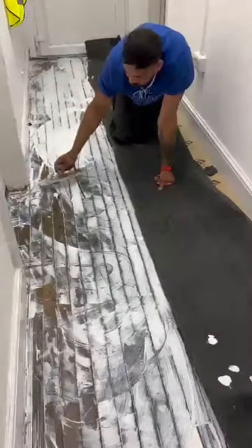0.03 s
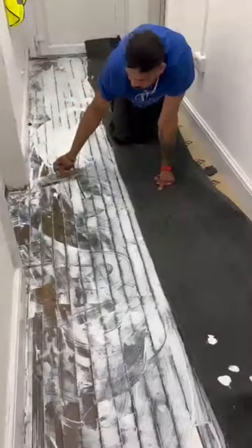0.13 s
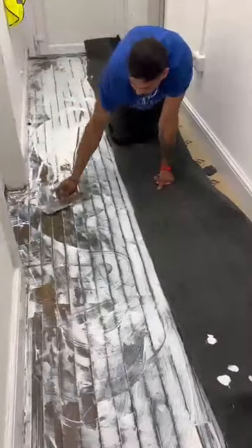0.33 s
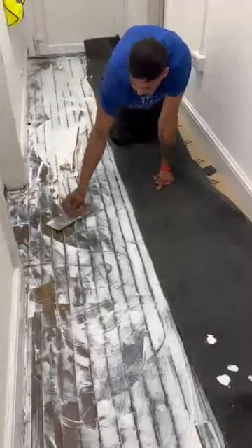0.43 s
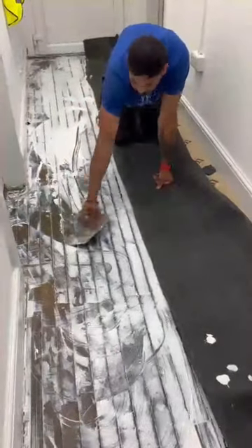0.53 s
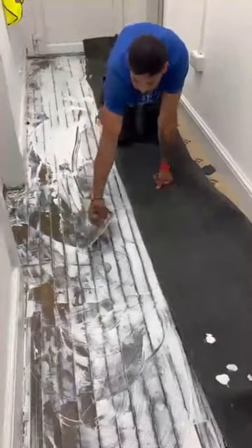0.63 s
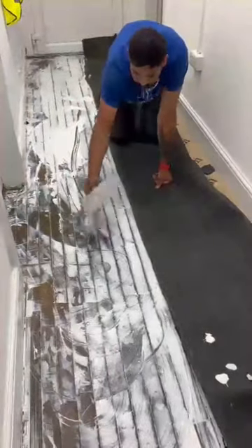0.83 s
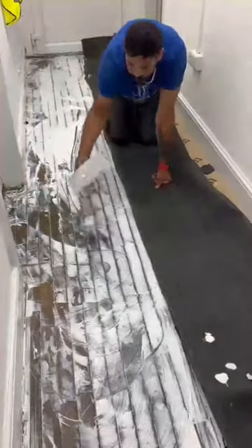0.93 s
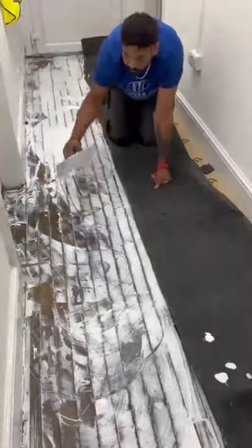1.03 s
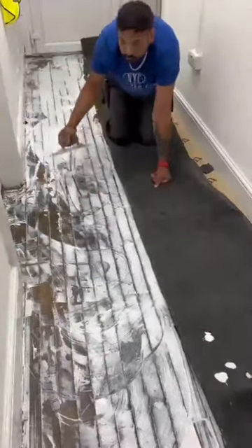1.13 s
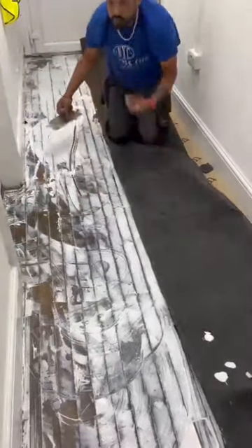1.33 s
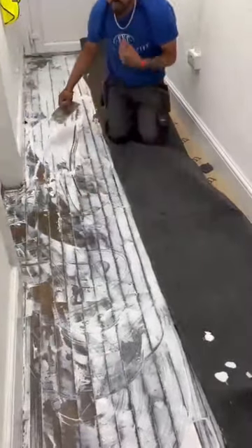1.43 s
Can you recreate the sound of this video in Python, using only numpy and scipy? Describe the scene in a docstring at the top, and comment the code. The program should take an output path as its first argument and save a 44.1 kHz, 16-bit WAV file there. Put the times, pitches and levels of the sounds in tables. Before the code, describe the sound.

One ringing scrape of a trowel over wet adhesive, then light knocks in a corridor.

```python
"""A trowel swept through wet glue

In a bare corridor, a notched steel trowel touches down and makes one sweep through floor glue.
Its teeth stick and slip in a ringing scrape, while the floor groans and the paste crackles. The pitch
climbs as the blade tilts up before lifting off. The kneeling worker then shifts back with soft knocks,
light scuffs of the blade and rustling clothes, over the low hum of the building."""
import sys
import numpy as np
from scipy import signal
from scipy.fft import rfft, irfft, next_fast_len
from scipy.io import wavfile
from scipy.ndimage import map_coordinates

SR = 44100
rng = np.random.default_rng(int(sys.argv[2]) if len(sys.argv) > 2 else 0)


def put_to_file(sound):
    """Save the sound as 16-bit audio at rate SR, in the file named by the first command-line argument."""
    columns = np.atleast_2d(sound).T  # one column per channel
    safe = np.clip(columns, -1, 1)
    whole_steps = np.round(safe * 32767)
    wavfile.write(sys.argv[1], SR, whole_steps.astype(np.int16))


N = 66150

# The sweep. Each row: time in seconds, then push on the blade, push on the floor and tearing
# of the paste in dB. All dB levels in these tables are relative.
SWEEP = [(.24, -80, -80, -94), (.295, -46.5, -47, -80), (.322, -37.5, -44, -51.5),
         (.352, -39, -39.5, -47.5), (.378, -36, -42, -42), (.428, -35, -41, -64.5), (.472, -31, -29, -39),
         (.525, -28.5, -31, -41), (.567, -35, -27.5, -39), (.608, -29.5, -36, -38), (.648, -31, -29, -36),
         (.68, -37, -40, -53), (.732, -51, -36.5, -56), (.765, -51, -50.5, -67), (.88, -72, -91, -89)]
# The blade stiffens as it tilts. Each row: time in seconds, main ring in Hz, low drone in Hz.
TILT_PITCHES = [(.32, 609.7, 298.6), (.40, 750.4, 314.8), (.45, 559.8, 330.1), (.54, 718.8, 331.7),
                (.595, 641.2, 327.6), (.635, 937.6, 357.3), (.72, 1000, 338.6)]
# Steady pitches that ring in the scrape. Each row: pitch in Hz, width in Hz, level in dB.
SCRAPE_RINGS = [(492, 96, -4), (593, 42, 1), (645, 60, -3), (816, 116, -5), (980, 45, -3), (1134, 34, -0.5),
                (1354, 73, -2), (1490, 108, -2), (1755, 200, -8), (2150, 77, -7.5)]
HIGH_RINGS = [(2750, 53, 1), (3160, 35, 1), (3567, 69, 3.5), (4340, 154, -2)]
# How the floor rings. Each row: pitch in Hz, level in dB, seconds to fade by 60 dB.
FLOOR_RINGS = [(132, -7.5, 0.31), (162.3, -5, 0.32), (190.2, 8, 0.15), (270.7, -2.5, 0.29),
               (343.9, -1.5, 0.31)]
# The edge catches. Each row: middle and half length in seconds, level in dB, pitch in Hz.
EDGE_SCUFFS = [(0.534, 0.016, -37.5, 1370), (.638, .017, -31, 948), (0.66, .026, -37, 2095),
               (1.125, 0.016, -61.5, 3200), (1.211, 0.011, -59.5, 3400), (1.32, 0.016, -60.5, 1900),
               (1.486, 0.021, -54.5, 2440)]
# The edge touches down. Each row: start in seconds, level in dB.
EDGE_TICKS = [(0.2006, -42), (0.202, -37.5), (0.21, -52.5)]
# Trowel, hand and knees hit the floor. Each row: start in seconds, thud in dB, clack in dB.
BLOWS = [(.206, -38.5, -51), (0.235, -33, -36.5), (0.2544, -27, -42.5), (0.345, -49.5, -26),
         (0.974, -40.5, -40.5), (1.036, -37.5, -60), (1.168, -46, -71), (1.318, -55, -42),
         (1.461, -45, -38.5)]
# The worker moves. Each row: time in seconds, swish of cloth in dB, rubbing on the floor in dB.
MOVES = [(0, -55, -47), (.05, -65.5, -55), (.075, -56.5, -92), (.16, -70, -76), (.28, -57.5, -53.5),
         (.4, -49, -51.5), (.88, -67, -58), (.94, -68, -56.5), (1.0, -63.5, -52), (1.06, -63.5, -57.5),
         (1.125, -62.5, -55.5), (1.18, -63, -66), (1.215, -59.5, -49.5), (1.27, -63, -60.5),
         (1.32, -63.5, -55), (1.39, -70.5, -69), (1.44, -72, -70), (1.49, -67, -70)]
# The building hums. Each row: pitch in Hz, level in dB.
HUM_TONES = [(57, -83), (113, -59), (167, -55.5), (220, -52), (344, -54)]
# Filters that colour each noise. Each row: frequency in Hz, level in dB.
# The narrow gap near 6-7 kHz is a filter over the sound, not part of paste, cloth or air.
CRACKLE_FILTER = [(300, 6.5), (900, -4.5), (1800, 3), (2700, 2.5), (3800, -9), (5200, 4), (6300, -38.5),
                  (7300, -11), (9200, -16), (11000, -36)]
TICK_FILTER = [(300, -9.5), (1000, 16), (2300, 10.5), (2900, 10.5), (4500, 9), (6500, -2), (9000, 6.5),
               (11000, 1)]
CLACK_FILTER = [(150, -16.5), (380, 8), (500, -7.5), (680, 7.5), (1100, -9.5), (2000, -24.5), (5000, -48),
                (11000, -49.5)]
SWISH_FILTER = [(300, -16), (1200, 3), (2200, 3), (3800, 7), (5200, 5.5), (6300, -28.5), (7300, 1.5),
                (9200, -1.5), (11000, -57)]
RUB_FILTER = [(120, -4.5), (350, 1.5), (480, -0.5), (660, 0.5), (1100, -10.5), (2000, -11.5), (4000, -12.5),
              (9000, -86)]
RUMBLE_FILTER = [(20, -30.5), (35, -1.5), (58, 5), (90, 2), (180, -2.5), (260, -4.5), (350, -7), (460, -19),
                 (650, -11), (1000, -20.5), (1700, -29), (4000, -29), (7000, -78), (11000, -40)]
# The corridor's echo. Each row: frequency in Hz, seconds to fade by 60 dB.
ECHO_FADES = [(150, 0.047), (400, 0.39), (1000, 0.41), (3000, 0.35), (6000, 0.037), (11000, 0.14)]
# Sound from all sides at two microphones. Each row: frequency in Hz, likeness (1 or more: the same).
BASS_LIKENESS = [(130, .9995)]
UPPER_LIKENESS = [(270, 1.1), (570, 0.56), (1200, -0.2), (2500, -0.26), (4500, -0.039), (9000, -0.87)]
# How the microphones differ. Each row: frequency in Hz, left minus right in dB.
BASS_BALANCE = [(185, 0)]
UPPER_BALANCE = [(340, 3), (620, 4.5), (1110, 4.5), (2000, 3.5), (3550, -1.5), (6350, -0.7), (11400, 0.5)]

RINGS_DB, EDGE_DB, HIGH_RINGS_DB, PASTE_DB = -3.5, -3.5, -6, -3
DRONE_DB, DRONE_TONE_DB, FLOOR_DB = -2.5, -4.5, -9.5
DIRECT_DB, ECHO_DB, AIR_DB = -3.5, -2.5, -47.5
TICK_FADE_S, CLACK_FADE_S, CLACK_RISE_S, THUD_RISE_S = 0.019, 0.062, 0.005, 0.0024
LEFT_LAG_S, TOP_HZ = 0.000118, 11900


def scrape():
    """Teeth slip in a ringing scrape as paste tears in tiny pops. Gives scrape and floor groan."""
    push_db, floor_push_db, tear_db = curves(SWEEP)
    edge_hz, drone_hz = curves(TILT_PITCHES)
    chatter = gain(2 * wobble(109.97))  # the level flickers quickly
    push, floor_push = chatter * gain(push_db), chatter * gain(floor_push_db)
    rings = gain(RINGS_DB) * resonate(push * slips(), SCRAPE_RINGS)
    edge = gain(EDGE_DB) * push * gliding_ring(slips(), edge_hz, width=0.38)
    drone = gain(DRONE_DB) * floor_push * gliding_ring(slips(), drone_hz, width=0.33)
    pops = clicks(per_second=2600, spread_db=4)
    paste = chatter * gain(PASTE_DB + tear_db) * coloured(pops, CRACKLE_FILTER)
    high_rings = chatter * gain(HIGH_RINGS_DB + tear_db) * resonate(slips(), HIGH_RINGS)
    floor_tap = np.diff(floor_ring(0))  # the floor's answer to one slip
    floor_tap /= np.linalg.norm(floor_tap)
    floor = gain(FLOOR_DB) * signal.fftconvolve(floor_push * slips(), floor_tap)[:N]
    tone = gain(DRONE_TONE_DB + floor_push_db) * drone_tone(drone_hz)
    return rings + edge + drone + paste + high_rings, floor + tone


def slips():
    """Steel sticks and lets go, making a tiny click each time."""
    return clicks(per_second=2200, spread_db=3)


def drone_tone(hz):
    """The firm core of the drone: a slightly unsteady tone that follows hz."""
    phase = 2 * np.pi * np.cumsum(hz) / SR + .5 * wobble(40)
    return normalise(gain(2 * wobble(39.3)) * np.sin(phase))


def scuffs():
    """Each catch of the edge swells and fades; its gritty ring rises as the blade tips."""
    out = np.zeros(N)
    for middle, half_s, db, hz in EDGE_SCUFFS:
        t = np.arange(N) / SR - middle
        octaves = 4.5 * np.clip(t, -2 * half_s, 2 * half_s)
        swell = gain(db) * np.exp(-.5 * (t / half_s) ** 2)
        out += swell * gliding_ring(slips(), hz * 2 ** octaves, width=0.36)
    return out


def knocks():
    """Each blow makes a short dull clack and sets the floor ringing. Gives clacks and thuds."""
    level = sum(gain(db) * (fade(start, CLACK_FADE_S) - fade(start, CLACK_RISE_S))
                for start, _, db in BLOWS)
    thuds = sum(gain(db) * floor_ring(start) for start, db, _ in BLOWS)
    return level * coloured(rng.standard_normal(N), CLACK_FILTER), thuds


def floor_ring(start):
    """After a soft blow, the floor's low tones build up quickly and die away."""
    t = np.maximum(np.arange(N) / SR - start, 0)
    ring = sum(gain(db) * fade(start, fade_s) * np.sin(2 * np.pi * hz * t)
               for hz, db, fade_s in FLOOR_RINGS)
    return ring * (1 - np.exp(-t / THUD_RISE_S))


def ticks():
    """The steel edge meets the floor in a quick cluster of bright ticks."""
    level = sum(gain(db) * fade(start, TICK_FADE_S) for start, db in EDGE_TICKS)
    return level * coloured(rng.standard_normal(N), TICK_FILTER)


def clothes():
    """Fabric swishes and knees rub as the worker moves."""
    swish_db, rub_db = curves(MOVES)
    flutter_db = 2.45 * wobble(43.62)
    fibres = clicks(per_second=6000, spread_db=4)
    swish = gain(swish_db + flutter_db) * coloured(fibres, SWISH_FILTER)
    rub = gain(rub_db + flutter_db) * coloured(rng.standard_normal(N), RUB_FILTER)
    return swish + rub


def corridor(x):
    """Bare walls throw the sound back; each frequency dies away at its own speed."""
    hz, t, noise = signal.stft(rng.standard_normal((2, SR // 2)), SR, nperseg=256)
    fade_s = look_up(ECHO_FADES, hz)[:, None]
    fading = noise * np.exp(-np.log(1000) * t / fade_s) / np.sqrt(fade_s)
    tail = signal.istft(fading, SR, nperseg=256)[1]
    tail /= np.linalg.norm(tail[0])
    tail = np.pad(tail, ((0, 0), (SR // 300, 0)))  # the echo arrives a little late
    return from_all_sides(signal.fftconvolve(x[None], tail, axes=1)[:, :N])


def building():
    """Steady rumble and air, with a few wavering hum tones."""
    air = normalise(from_all_sides(coloured(rng.standard_normal((2, N)), RUMBLE_FILTER)))
    t = np.arange(N) / SR
    hum = sum(gain(db + 4.5 * wobble(6.88)) * np.sin(2 * np.pi * hz * t + 1.07 * wobble(6.22))
              for hz, db in HUM_TONES)
    return gain(AIR_DB) * air + hum


def from_all_sides(pair):
    """Blends two unrelated sounds into left and right, nearly alike in the bass."""
    def blend(hz):
        likeness = np.clip(look_up(BASS_LIKENESS + UPPER_LIKENESS, hz), -1, 1)
        angle = np.arccos(likeness) / 2
        return np.array([np.cos(angle), np.sin(angle)])
    mid, side = filtered(pair, blend)
    return np.array([mid + side, mid - side])


def resonate(x, rings):
    """Lets x ring at several fixed pitches."""
    def response(hz):
        total = sum((-1) ** k * gain(db) * peak(hz, pitch, width)
                    for k, (pitch, width, db) in enumerate(rings))
        return total / np.sqrt(np.mean(abs(total) ** 2))
    return filtered(x, response)


def gliding_ring(x, hz, width):
    """Rings x at one pitch, then bends it to follow hz; width is a share of the pitch."""
    pitch = hz.mean()
    ring = filtered(x, lambda f: peak(f, pitch, width * pitch) ** 2)
    position = np.cumsum(hz / pitch)  # reading faster raises the pitch
    return normalise(map_coordinates(ring, [position], mode="mirror"))


def peak(hz, pitch, width_hz):
    """A filter shape that favours frequencies near one pitch."""
    return 1j * hz * width_hz / (pitch ** 2 - hz ** 2 + 1j * hz * width_hz)


def clicks(per_second, spread_db):
    """Tiny clicks of random size at random times."""
    size = gain(spread_db * np.clip(rng.standard_normal(N), -2, 2)) * rng.choice([-1, 1], N)
    return normalise(size * (rng.random(N) < per_second / SR))


def fade(start, fade_s):
    """A level that jumps to 1 at start, then falls 60 dB every fade_s seconds."""
    t = np.arange(N) / SR - start
    return (t >= 0) * np.exp(-np.log(1000) * np.abs(t) / fade_s)


def wobble(rate):
    """A smooth curve through rate random values a second."""
    points = rng.standard_normal(int(N * rate / SR) + 4)
    return map_coordinates(points, [np.arange(N) * rate / SR])


def coloured(x, rows):
    """Shapes the lows and highs of x by a filter table, at a standard strength."""
    return normalise(filtered(x, lambda hz: gain(look_up(rows, hz))))


def filtered(x, response):
    """Multiplies each frequency in x by response(hz)."""
    size = next_fast_len(N + SR // 2)
    return irfft(rfft(x, size) * response(np.fft.rfftfreq(size, 1 / SR)), size)[..., :N]


def curves(rows):
    """Turns each column after the time into one value per sample."""
    times, *columns = np.transpose(rows)
    return [np.interp(np.arange(N) / SR, times, column) for column in columns]


def look_up(rows, hz):
    """Reads between the rows of a frequency table, on a log scale."""
    frequencies, values = np.transpose(rows)
    return np.interp(np.log(hz + 1), np.log(frequencies + 1), values)


def normalise(x):
    """Scales x to an average strength (rms) of 1."""
    return x / np.sqrt(np.mean(x ** 2) + 1e-20)


def gain(db):
    """Turns decibels into a multiplier."""
    return 10 ** (np.asarray(db) / 20)


def scene():
    """The work reaches the right microphone first and echoes off the walls; the floor booms close by."""
    scraping, groan = scrape()
    clacks, thuds = knocks()
    work = scraping + clacks + ticks() + scuffs() + clothes()
    delays = LEFT_LAG_S * np.array([[.5], [-.5]])
    direct = filtered(work + groan + thuds, lambda hz: np.exp(-2j * np.pi * hz * delays))
    return gain(DIRECT_DB) * direct + gain(ECHO_DB) * corridor(work) + building()


def record(dry):
    """The two microphones differ in colour above the bass; everything above TOP_HZ is cut."""
    sides = np.array([[.5], [-.5]])
    heard = filtered(dry, lambda hz: gain(look_up(BASS_BALANCE + UPPER_BALANCE, hz) * sides))
    return filtered(heard, lambda hz: hz < TOP_HZ)


dry = scene()
out = record(dry)
put_to_file(out)
```